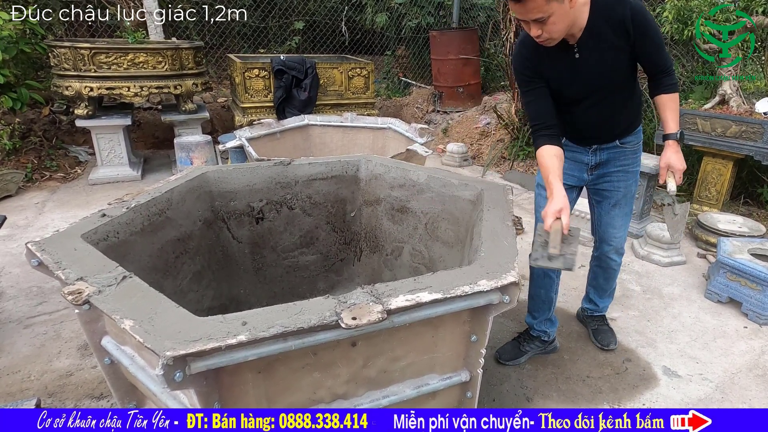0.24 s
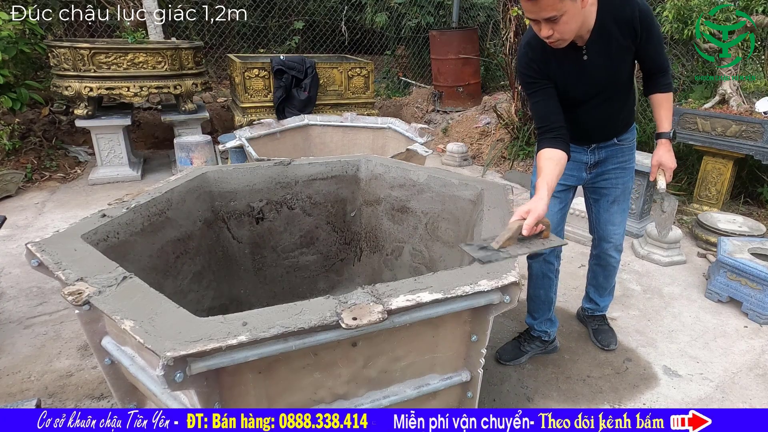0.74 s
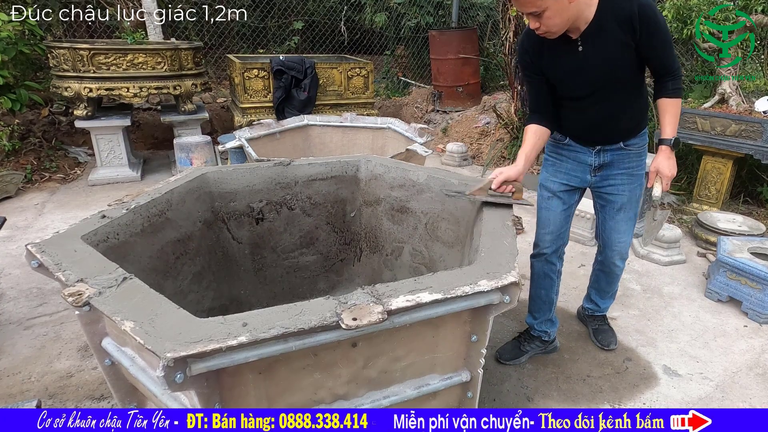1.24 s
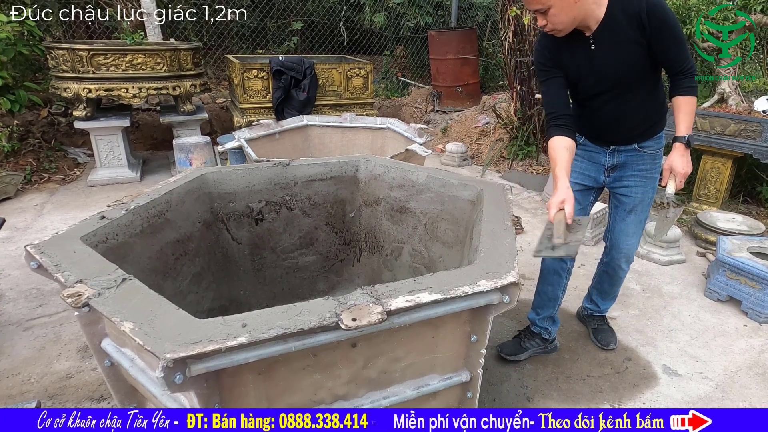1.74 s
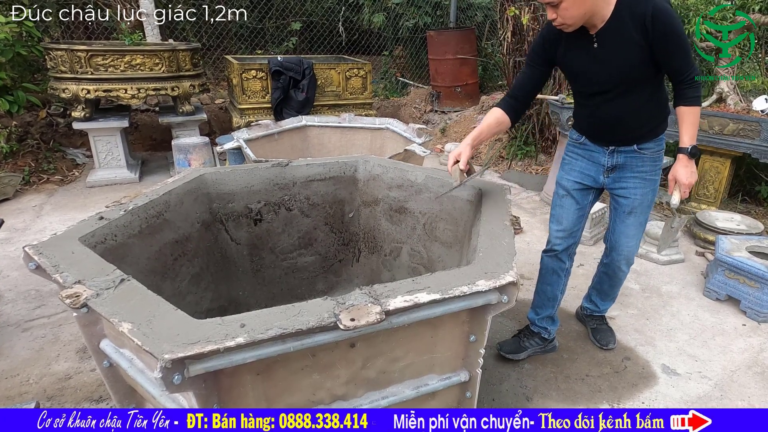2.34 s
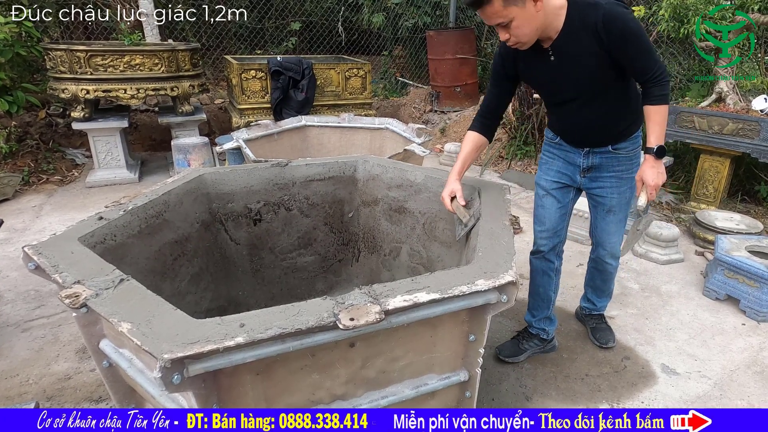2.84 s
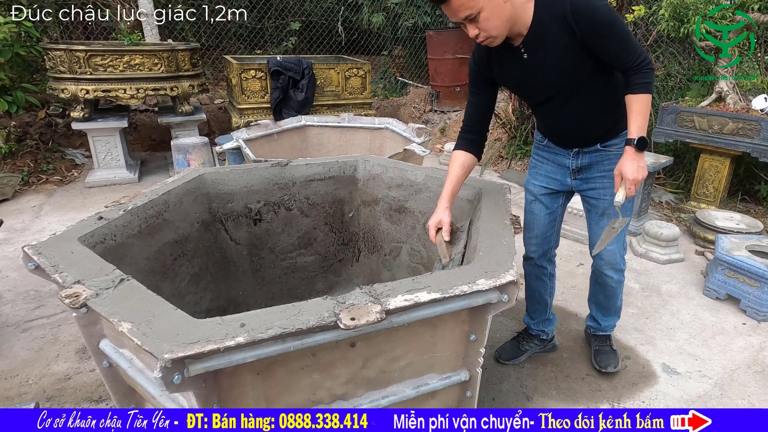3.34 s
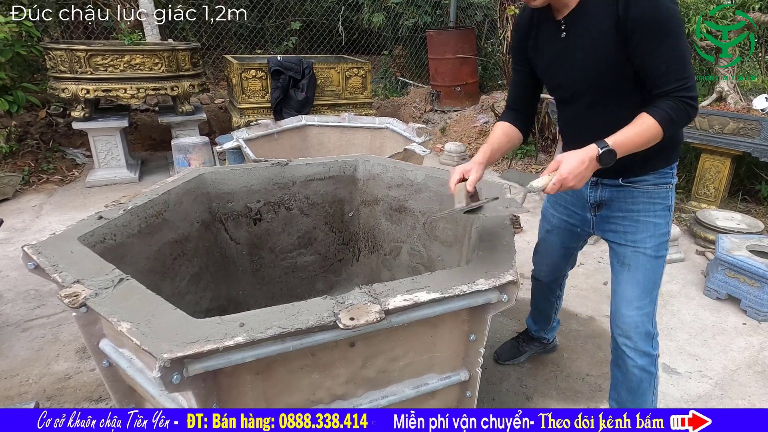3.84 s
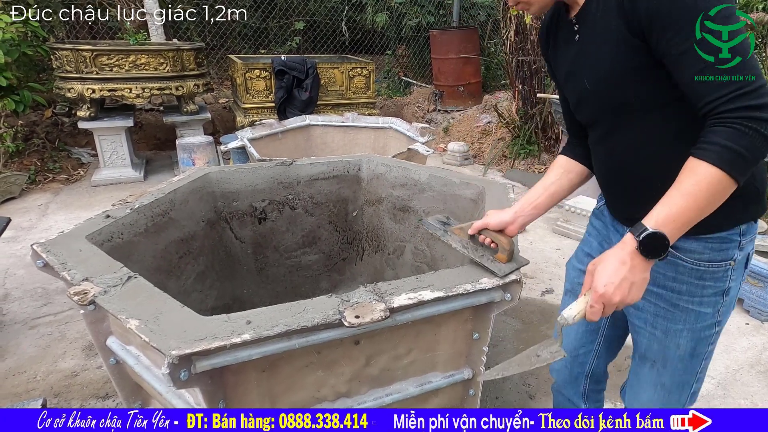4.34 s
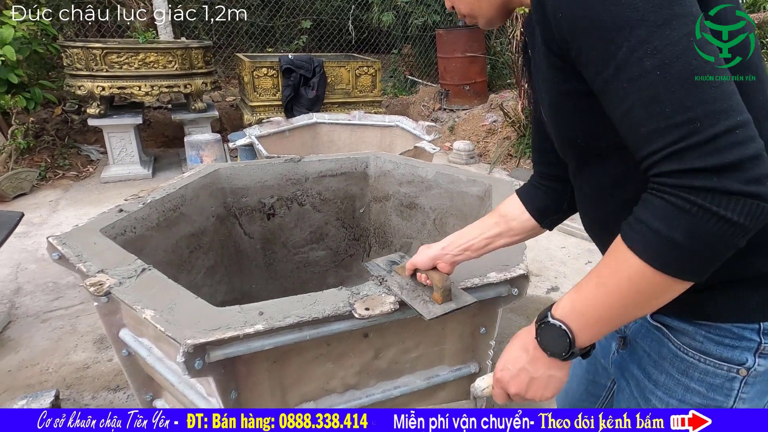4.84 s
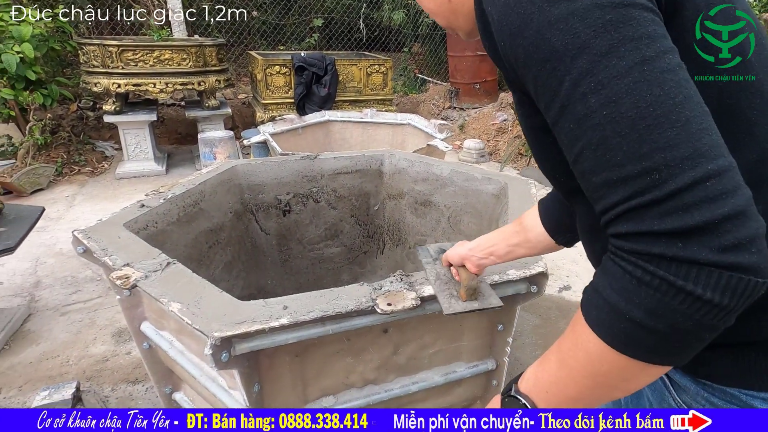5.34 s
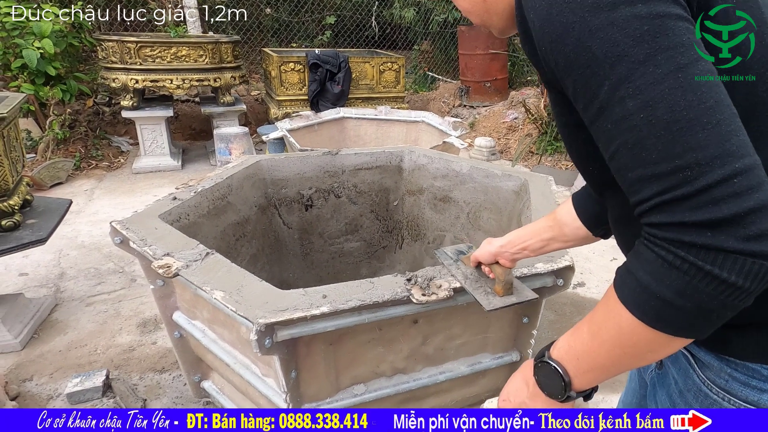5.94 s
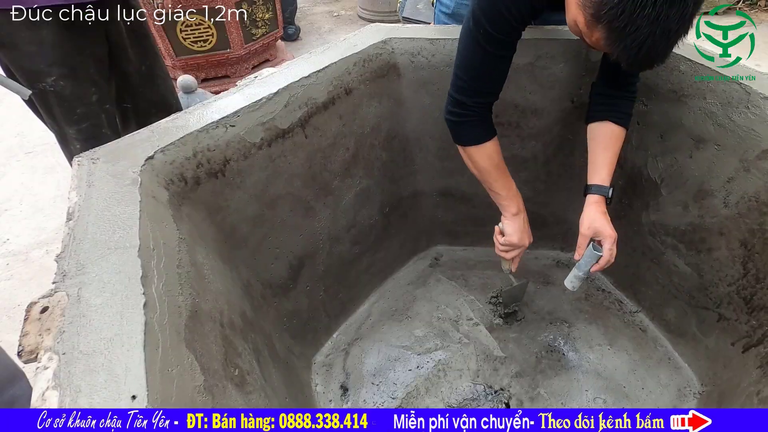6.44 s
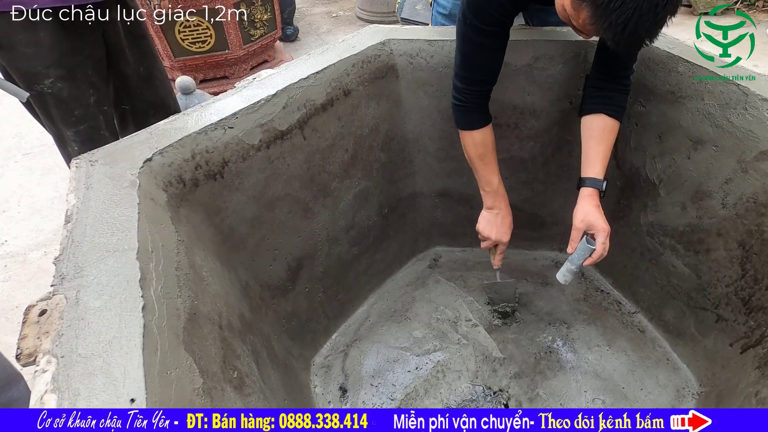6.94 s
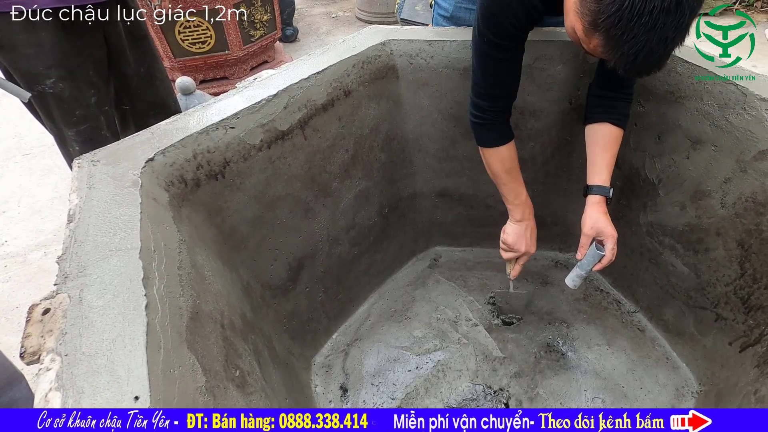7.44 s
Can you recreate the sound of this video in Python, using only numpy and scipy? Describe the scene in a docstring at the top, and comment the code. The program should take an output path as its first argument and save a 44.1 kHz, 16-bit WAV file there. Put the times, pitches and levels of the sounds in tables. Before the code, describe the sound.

A steel trowel rasps over gritty wet cement in short uneven strokes with taps, then quieter scrapes and grit snaps inside a booming hollow mould.

```python
"""Trowel on wet cement

A steel trowel smooths wet cement on the rim of a big planter mould in a yard, then works inside the mould.
Random sand grains under the blade hiss, ring the damped steel and, under pressure, the mould wall.
Short bursts of noise make the taps and the grit snaps; decaying sines make the thuds,
and brief unsteady sines make low hums and high squeaks.
Filtered noise gives a low outdoor rumble under it all, which booms once the work is inside.
"""
import sys
import numpy as np
from scipy import signal
from scipy.fft import rfft, irfft
from scipy.io import wavfile
from scipy.ndimage import uniform_filter1d

SR = 44100
rng = np.random.default_rng(int(sys.argv[2]) if len(sys.argv) > 2 else 0)


def store_wav(level_fs):
    """Save 16-bit WAV to argv[1]."""
    pcm = np.round(np.clip(np.atleast_2d(level_fs), -1, 1) * 32767)
    wavfile.write(sys.argv[1], SR, pcm.T.astype(np.int16))


N = 338688
T = np.arange(N) / SR  # time in seconds
FREQS = np.maximum(np.arange(N // 2 + 1) * SR / N, 1)  # in Hz

# Levels are in dB; most layers also add a gain of their own later.
# A stroke lands, presses harder, eases and lifts. Each row: start in seconds, press time in seconds,
# ease time in seconds, rasp at its hardest in dB, swell before that in dB, drop after it in dB; then, against
# the rasp, blade ring in dB, wall drag in dB, wet fizz in dB and extra ring as the blade slides off in dB;
# then centre of the rasp in Hz and centre of the blade ring in Hz.
STROKE_ROWS = [ (.092, .045, .012, -37, 10, 4, -3, -14, -15, 0, 3200, 1340),
               (.155, .105, 0.044, -37, 3, -2.5, -8, -13.5, -16, -17, 2980, 1320),
               (0.304, 0.02, 0.042, -28.5, 6.5, 1.5, -5, -15, -15, 8, 2870, 1380),
               (.726, 0.054, .014, -42.5, 0, 8.5, -5.5, -12.5, -13.5, 3, 3250, 1440),
               (0.804, 0.066, 0.019, -31.5, 7, 1, -2, -11, -16.5, 3, 2950, 1480),
               (.89, 0.041, 0.048, -28, 3.5, 2.5, -9.5, -17, -16, 11, 3250, 1290),
               (1.342, 0.015, 0.032, -35, 6, 5.5, 1.5, -16, -18.5, -12, 2300, 1230),
               (1.395, 0.021, .018, -33.5, 2, 2.5, -2.5, -20, -16.5, 2, 2300, 1280),
               (1.449, .006, 0.013, -43.5, -2, 10, 0, -12, -11, -2, 2490, 1370),
               (1.521, .006, .02, -50.5, 2, 10, -3, -4, -18, -6, 2500, 1310),
               (1.636, 0.21, .024, -27.5, 16.5, 0.5, -13, -22.5, -14.5, 15, 3250, 1390),
               (1.88, 0.043, 0.14, -56, 2, 16, -13.5, -10, -21, 0, 3200, 1330),
               (2.44, 0.14, 0.019, -70, 4, 0, -3, -3.5, -15, 12, 3200, 1000),
               (2.83, .145, .02, -58.5, 17, 0, -3, -20, -13, 0, 2700, 1470),
               (2.975, .012, 0.11, -50.5, 3, 3.5, -1.5, -16, -15, 2.5, 2800, 1500),
               (3.11, 0.036, .02, -49, 17, 2.5, -4, -21, -16, 1, 2850, 1390),
               (3.179, .04, .13, -49.5, -1, 11, 0, -23, -15.5, 0, 3000, 1550),
               (3.364, 0.073, 0.016, -40.5, 10, 9, -3, -16, -16, 8.5, 2860, 1590),
               (3.882, 0.0045, 0.025, -31.5, 7, 13, -7, -16.5, -20, 15, 2420, 1520),
               (3.906, 0.049, 0.096, -30, 9.5, 21.5, -0.5, -14.5, -14.5, 7, 2750, 1480),
               (4.335, .02, .005, -52, 8, 0, 5, -7, -24, 0, 3200, 1200),
               (4.352, 0.072, 0.0086, -32, 5, 7.5, 7.5, -6, -20.5, 0, 2700, 1295),
               (4.483, .004, 0.043, -34.5, 1, 17.5, -1, -15.5, -16, 8.5, 3450, 1570),
               (4.565, 0.016, 0.039, -48.5, 18, 9, -6, -14, -16, 5, 2550, 1480),
               (4.644, 0.075, .01, -40, 13, 0, 0, -15.5, -16, -5, 2960, 1520),
               (4.721, 0.024, 0.055, -29.5, 11, 2.5, 2, -8, -18.5, -2.5, 2750, 1460),
               (4.815, .11, .045, -27.5, 3.5, 1.5, 0, -12.5, -15.5, 2, 2980, 1350),
               (4.965, .008, .035, -33, 0, 12, -1, -3, -13, 0, 3000, 1240),
               (5.0, 0.016, 0.076, -52, -8, 16, 8, 3, -20, 4, 2900, 1100),
               (5.117, 0.15, .02, -40.5, 12, 5, 2.5, -4, -19.5, 3.5, 2800, 1240),
               (5.263, 0.092, 0.038, -32.5, 8, 10.5, -3.5, -7.5, -14.5, 1, 3480, 1510),
               (5.40, .04, 0.044, -39, 1, -0.5, -5.5, -9, -16.5, 4, 3000, 1470),
               (5.475, 0.068, 0.075, -27.5, 9, 10.5, 2.5, -9.5, -15, -3, 3050, 1500),
               (5.618, 0.095, 0.072, -28, 8.5, 7.5, 0.5, -8.5, -16.5, -4, 2950, 1440),
               (5.795, 0.054, 0.069, -28.5, 8.5, 0, 2, -7, -16.5, -7.5, 2820, 1600),
               (5.925, 0.1, 0.063, -31.5, 9.5, 5.5, 2, -5.5, -14.5, -1.5, 3230, 1480),
               (6.094, 0.062, 0.0055, -38.5, 5, 4.5, -2, -6, -14, 1.5, 3360, 1580),
               (6.279, 0.026, .008, -53, 1, 7, -3, -11, -7, 3, 2700, 1640),
               (6.312, 0.012, 0.029, -34.5, 11, 0.5, 7, -6, -20, -7, 2320, 1620),
               (6.36, .01, 0.081, -49, 0, 17, -5, -10, -11.5, -2, 2600, 1300),
               (6.455, 0.024, 0.0074, -38, 18, 5.5, -0.5, -8, -12, 4, 3180, 1280),
               (6.519, 0.013, 0.16, -53, -11, 15, -0.5, -7, -8.5, 0, 2550, 1230),
               (6.725, 0.047, 0.05, -49.5, 13, 7, 0.5, -7, -10, 7.5, 4050, 1260),
               (6.86, 0.11, .1, -55, 11, 11, 3, -12, -10, 0, 2700, 1230),
               (7.19, .068, .008, -44.5, 19.5, 5, -1.5, -14, -11.5, -5, 4270, 1450),
               (7.421, .057, 0.012, -43.5, 5, -1, -6, -13.5, -14, -1, 2950, 1380),
               (7.48, 0.027, 0.078, -33, 16, 23.5, -10.5, -15, -19.5, -6, 2560, 1620),
               (7.606, 0.027, 0.037, -45, 10, -2.5, -10, -15, -20, 6.5, 2540, 1330), ]
# The flat blade lands or chatters. Each row: start in seconds, dull body in dB, bright edge in dB.
TAP_ROWS = [(0.097, -63, -22.5), (.134, -51, -33), (.26, -50, -31), (0.727, -52.5, -32.5),
            (1.318, -43.5, -32.5), (1.341, -48, -36), (1.452, -52, -33.5), (1.52, -48, -38),
            (1.641, -49, -35), (2.593, -72, -53), (2.98, -64, -44), (3.071, -63, -44), (3.183, -62, -33.5),
            (3.219, -70, -40), (3.431, -48.5, -29), (3.88, -65, -22.5), (3.938, -39.5, -29),
            (4.056, -42.5, -32.5), (4.356, -49, -39), (4.416, -34.5, -39), (4.479, -63, -32),
            (4.716, -51, -25), (5.127, -36, -33), (5.162, -37, -32), (5.187, -39, -32), (5.21, -36, -36),
            (5.265, -42.5, -30), (6.328, -47, -30), (7.53, -46, -46), (7.604, -51, -32.5),
            (7.634, -57, -37)]
# Grit snaps under the steel. Each row: start in seconds, level in dB.
SNAP_ROWS = [(2.484, -60), (2.5336, -58), (6.477, -40), (6.5122, -17), (6.5404, -54), (6.6722, -48),
             (6.762, -31), (6.7825, -32), (6.8014, -24.5), (6.8625, -43), (6.8867, -41), (6.967, -42),
             (6.978, -39), (7.2555, -34.5), (7.602, -49)]
# The mould takes the weight of the hand. Each row: start in seconds, level in dB, pitch in Hz.
THUD_ROWS = [(0.167, -48.5, 119), (.33, -40.5, 149.3), (0.391, -42, 53.5), (0.74, -38, 94.4),
             (0.866, -45, 125), (1.328, -46, 110), (1.359, -45, 145), (1.852, -49, 169.1),
             (5.25, -39.5, 154), (5.592, -37.5, 147), (6.307, -42, 117), (6.77, -43.5, 231)]
# Brief unsteady tones, from low hums to high squeaks.
# Each row: middle in seconds, half length in seconds, pitch in Hz, level in dB.
TONE_ROWS = [(0.264, 0.0046, 598, -33), (.935, 0.023, 3930, -33), (1.36, 0.023, 1213, -42),
             (1.40, .04, 3710, -46), (1.856, 0.011, 399, -38), (1.868, 0.011, 1247, -32),
             (2.596, .006, 820, -58), (2.99, .02, 2850, -45), (3.19, .09, 5450, -61),
             (4.392, 0.022, 358, -40), (4.404, .01, 2640, -27.5), (4.845, 0.014, 2540, -26.5),
             (5.32, 0.016, 1400, -33), (5.41, .01, 2120, -37), (5.538, .025, 1400, -25.5),
             (5.725, 0.026, 3100, -26.5), (5.827, 0.023, 600, -32), (5.865, .024, 1400, -30),
             (5.916, .012, 1680, -26), (5.957, 0.024, 152.7, -33.5), (6.004, 0.041, 380, -35)]

# Damped resonances of the whole blade, of its edge, of the mould wall and of a small pointed trowel.
# Each row: pitch in Hz, width in Hz before extra damping, level in dB.
BLADE_MODES = [(888, 160, -3.5), (1052, 160, -4.5), (1205, 153, -2), (1375, 102, -1), (1520, 52, -6.5),
               (1628, 254, -0.5), (1815, 75, -5.5)]
EDGE_MODES = [(2057, 224, 4), (2265, 193, 2), (2505, 220, 0.5), (2800, 120, 1), (3112, 185, -1),
              (3620, 233, -2.5), (3910, 220, -0.5), (4170, 170, 0), (4403, 65, 1), (4630, 400, -1),
              (5235, 480, 0), (6280, 130, -4.5)]
WALL_MODES = [(157, 55, 2), (248.7, 41, -4.5), (390, 130, -4), (556.5, 130, -1.5), (647, 113, -4),
              (836, 77, -6.5)]
POINT_MODES = [(1160, 390, -12.5), (1840, 470, -7), (2740, 1600, -10.5), (3520, 330, -3), (4570, 360, 1.5),
               (5400, 460, -6), (5850, 400, -9), (8870, 480, -7.5), (11600, 2400, -17.5)]

# Tone colours of the sand hiss, the dull knock, the open yard and the hollow mould.
# Each row: frequency in Hz, level per Hz in dB.
SAND_COLOUR = [(300, -33), (1200, -7.5), (2000, -3.5), (3000, -1), (5300, -9), (7000, -19), (8700, -21),
               (10500, -30.5), (12300, -33.5), (14500, -52)]
KNOCK_COLOUR = [(150, -7), (450, -23.5), (750, -9.5), (1020, -2.5), (1250, -1), (1500, -9.5), (1850, -5),
                (2400, -19), (5000, -80)]
YARD_COLOUR = [(12, -49), (20, -9.5), (49, -5), (92, -10.5), (135, -20), (174, -12.5), (270, -20.5),
               (328, -27.5), (367, -25), (656, -34), (1080, -31), (1310, -28), (2040, -36.5), (6360, -42.5),
               (15000, -74.5)]
HOLLOW_COLOUR = [(12, -31), (20, -4.5), (49, 3), (205, -10.5), (242, -13), (377, -20), (470, -26),
                 (1460, -27.5), (2850, -37.5), (3180, -40), (3460, -44), (6360, -48), (6910, -53),
                 (10200, -64), (15000, -92)]

# Rough loudness of the rumble over time. Each row: time in seconds, level in dB.
RUMBLE_LOUDNESS = [(0, -1), (1.1, -2), (2.4, -4.5), (3.5, 0), (5.1, 0), (6.4, -3), (7.68, -2)]
# Sound that reaches the two microphone ports unrelated. Each row: frequency in Hz, level against direct in dB.
SCATTER_SHARE = [(60, -23), (300, -16), (1300, -13), (3000, -9), (6500, -5), (14000, -2)]

YARD_DB, HOLLOW_DB = -53.5, -40  # rumble levels before its loudness curve
INSIDE_S = 6.285  # the work moves inside the mould
PORT_LAG_S = 3.7e-5
TOP_HZ = 13900
LAND_S, LIFT_S = 0.0016, 0.011  # how fast the blade bites and lets go
SLIDE_OFF_S, SLIDE_OFF_OCTAVES = 0.021, .17  # as a stroke ends, the ring's level shifts and its centre falls
SLIDE_OFF_WALL = 0.8  # share of that extra ring, in dB, that reaches the wall
BLADE_LAW, WALL_LAW, FIZZ_LAW = 1.08, 0.71, 0.99  # dB gained per dB of rasp as the hand presses


def undb(db):
    """Turn decibels into gain."""
    return 10 ** (np.asarray(db) / 20)


def unit(x):
    """Scale to an average (rms) level of 1."""
    return x / np.sqrt(np.mean(x ** 2))


def gains(points):
    """Draw a gain curve over all frequencies through (Hz, dB) points."""
    hz, db = np.transpose(points)
    return undb(np.interp(np.log(FREQS), np.log(hz), db))


def colour(x, points):
    """Give sound the tone of (Hz, dB) points, with no smear ahead of each hit."""
    # folding the cepstrum makes the filter act only after its input
    cepstrum = irfft(np.log(gains(points)), N)
    cepstrum[1:N // 2] *= 2
    cepstrum[N // 2 + 1:] = 0
    return irfft(rfft(x) * np.exp(rfft(cepstrum)), N)


def band(x, lo_hz, hi_hz, order=3):
    """Keep the sound between two frequencies."""
    edges = [lo_hz, min(hi_hz, SR / 2 - 1)]
    return signal.sosfilt(signal.butter(order, edges, "band", fs=SR, output="sos"), x)


def ring(x, modes, damping):
    """Strike a set of resonances; more damping makes them wider and shorter."""
    out = 0
    for k, (hz, width, db) in enumerate(modes):
        sharpness = max(hz / (width * damping), 1)
        mode = signal.lfilter(*signal.iirpeak(hz, sharpness, SR), x)
        out = out + (-1) ** k * undb(db) * mode  # alternate signs
    return out


def walk(rate):
    """Wander smoothly by chance around 0, with an rms of 1."""
    k = max(int(SR / rate), 1)
    steps = np.repeat(rng.standard_normal(N // k + 1), k)[:N]
    return unit(uniform_filter1d(steps, k))


def rumble(points, db):
    """Outdoor noise: the bass wavers a little and is alike on both sides, the hiss is wide."""
    mid, side = rfft(rng.standard_normal((2, N))) * gains(points)
    side = side * gains([(60, -22.0), (200, -14), (1000, -5.5), (4000, -1.0)])
    air = irfft(np.array([mid + side, mid - side]), N)
    waver = undb(1.7 * walk(7))
    bass = band(air, 13, 220, order=1)
    return undb(db) * unit(air + bass * (waver - 1))


def grit(rate, spread_db, judder_db, judder_rate):
    """Sand grains of unequal size, bunched as the blade sticks and slips; rows: direct, scattered."""
    size = undb(spread_db * np.minimum(rng.exponential(size=N), 4))
    hits = rng.random(N) < rate / SR  # rate is grains per second
    judder = undb(judder_db * walk(judder_rate))
    return hits * size * rng.standard_normal((2, N)) * judder


def stray_grit(db=-78, inside_db=9):
    """Loose grains tick faintly under shoes and tool, louder inside the mould."""
    ticks = grit(rate=45, spread_db=3.5, judder_db=3, judder_rate=6)
    level = undb(db + inside_db * (T > INSIDE_S))
    return level * unit(band(ticks, 1400, 4860, order=4))


def pressure():
    """Hand pressure sets the gains of rasp, blade, wall and fizz, and the centres of rasp and blade ring."""
    out, centres = np.zeros((4, N)), np.full((2, N), 2000.)
    for (s, press_s, ease_s, db, swell_db, drop_db,
         blade_db, wall_db, fizz_db, off_db, edge_hz, blade_hz) in STROKE_ROWS:
        length = press_s + ease_s
        near = slice(*np.searchsorted(T, [s - .02, s + length + .15]))
        age = T[near] - s
        push_db = np.interp(age, [0, press_s, length], [-swell_db, 0, -drop_db])
        contact = np.exp(np.minimum(age, 0) / LAND_S - np.maximum(age - length, 0) / LIFT_S)
        off = np.exp(-(np.minimum(age - length, 0) / SLIDE_OFF_S) ** 2)
        layers_db = np.array([
            push_db,
            blade_db + BLADE_LAW * push_db + off_db * off,
            wall_db + WALL_LAW * push_db + SLIDE_OFF_WALL * off_db * off,
            fizz_db + FIZZ_LAW * push_db])
        layers = contact * undb(db + layers_db)
        pitch = [np.full(len(age), edge_hz), blade_hz * 2 ** (-SLIDE_OFF_OCTAVES * off)]
        # where strokes overlap, the louder rasp picks the pitch and each layer keeps its louder gain
        centres[:, near] = np.where(layers[0] > out[0, near], pitch, centres[:, near])
        out[:, near] = np.maximum(out[:, near], layers)
    return out, centres


def sliding_ring(x, modes, centre_hz, focus_octaves, damping):
    """The contact point favours modes near a centre; each swells, fades and bends as it slides."""
    out = 0
    for hz, width, db in modes:
        favour = 1 / (1 + (np.log2(hz / centre_hz) / focus_octaves) ** 2)
        wander = undb(1.8 * walk(7))
        once = ring(x, [(hz, width, db)], damping)
        mode = ring(once, [(hz, width, 0)], damping)
        # the shifting load bends the pitch slightly: read the sound early or late by some samples
        bent = np.arange(N) + 14 * walk(7)
        mode = np.array([np.interp(bent, np.arange(N), row) for row in mode])
        out = out + favour * wander * mode
    return out


def hold(x, smooth_s=0.026):
    """Bring the running rms to 1, so that the pressure gains set the loudness."""
    power = uniform_filter1d(np.mean(x ** 2, axis=0), int(smooth_s * SR))
    return x / np.sqrt(power + 1e-12)


def crackling(fizz, rim_db=-7, inside_db=1):
    """Single coarse grains pop and ring the pointed steel, most of all inside the mould."""
    pops = grit(rate=350, spread_db=3, judder_db=2, judder_rate=40)
    place = undb(np.where(T < INSIDE_S, rim_db, inside_db))
    rung = ring(pops, POINT_MODES, damping=2.5)
    return fizz * place * unit(band(rung, 2500, 16400, order=2))


def scraping():
    """One stream of grains hisses at the edge, rings the blade and shakes the wall."""
    (rasp, blade, wall, fizz), (edge_hz, blade_hz) = pressure()
    grains = grit(rate=15000, spread_db=2.5, judder_db=1.0, judder_rate=240)
    sand = colour(grains, SAND_COLOUR)
    edge = hold(sliding_ring(grains, EDGE_MODES, edge_hz, focus_octaves=0.53, damping=1.47))
    hiss = unit(band(sand, 2210, 6370, order=2))
    blade_ring = hold(sliding_ring(grains, BLADE_MODES, blade_hz, focus_octaves=0.35, damping=1.56))
    wall_drag = hold(sliding_ring(grains, WALL_MODES, 360, focus_octaves=11, damping=1.76))
    wet_fizz = unit(band(sand, 6440, 13500, order=4))
    out = rasp * (undb(-2.5) * edge + undb(-4.0) * hiss)
    out += undb(-1.96) * blade * blade_ring
    out += undb(1.0) * wall * wall_drag
    return out + crackling(fizz) + undb(1.5) * fizz * wet_fizz


def blows(times, dbs, crack_s, tail_s, tail_db):
    """Each blow is a short crunch of contacts with a weaker rattle after it; rows: direct, scattered."""
    out, age = np.zeros((2, N + SR)), T[:SR // 4]
    shape = np.exp(-age / crack_s) + undb(tail_db) * np.exp(-age / tail_s)
    shape *= 1 - np.exp(-age / (crack_s / 5))  # the contact gives a little before it bites
    for s, db in zip(times, dbs):
        crunch = rng.choice([-1, 1], (2, len(age))) * shape
        start = int(s * SR)
        out[:, start:start + len(age)] += undb(db) * crunch
    return out[:, :N]


def tapping():
    """The blade lands with a dull knock and a gritty edge."""
    s, body_db, edge_db = np.transpose(TAP_ROWS)
    body = blows(s, body_db, crack_s=0.0041, tail_s=0.028, tail_db=-12.5)
    body = colour(body, KNOCK_COLOUR)
    edge = blows(s, edge_db, crack_s=0.0026, tail_s=0.024, tail_db=-13.5)
    edge = band(colour(edge, SAND_COLOUR), 1850, 12600, order=2)
    return undb(28) * body + undb(8.0) * edge


def thudding(decay_s=0.031, rise_s=0.0018):
    """The heavy mould answers a push with a few slow cycles that die away."""
    out = np.zeros(N)
    age = T[:SR // 3]
    shape = np.exp(-age / decay_s) * 2 * (1 - np.exp(-age / rise_s))
    for s, db, hz in THUD_ROWS:
        start = int(s * SR)
        out[start:start + len(age)] += undb(db) * np.sin(2 * np.pi * hz * age) * shape
    return out


def brief_tones(width_share=0.018, least_width_hz=25):
    """Single sines swell and fade briefly with an unsteady pitch, from low hums to high squeaks."""
    out = np.zeros(N)
    drift = walk(120)
    for s, half_s, hz, db in TONE_ROWS:
        near = np.abs(T - s) < 3 * half_s
        pitch = hz + max(width_share * hz, least_width_hz) * drift[near]
        shape = np.exp(-((T[near] - s) / half_s) ** 2)
        out[near] += undb(db) * shape * np.sin(2 * np.pi * np.cumsum(pitch) / SR)
    return out


def snapping():
    """Grains crack under the steel and ring the small stiff pointed blade."""
    s, db = np.transpose(SNAP_ROWS)
    cracks = blows(s, db, crack_s=0.0017, tail_s=0.0064, tail_db=-20.5)
    rung = ring(cracks, POINT_MODES, damping=0.93)
    return undb(13.5) * band(rung, 750, 8300, order=2)


def rim_echo(x, lag_s=.0032, sway=0.226, echo_db=-8):
    """The mould's wall returns the scraping a moment later; the delay drifts as the hand moves."""
    hand = np.interp(T, np.arange(0, 8, .25), rng.standard_normal(32))
    heard = T - lag_s * np.exp(sway * hand)
    echo = np.array([np.interp(heard, T, row, left=0) for row in x])
    return (x + undb(echo_db) * echo) / np.sqrt(1 + undb(echo_db) ** 2)


def ports(x):
    """Two close ports: the left hears later, and the scattered treble differs between them."""
    direct, scattered = rfft(x) / np.sqrt(1 + gains(SCATTER_SHARE) ** 2)
    scattered = scattered * gains(SCATTER_SHARE)
    lag = np.exp(-2j * np.pi * FREQS * PORT_LAG_S)
    left_tone = gains([(150, -1.1), (700, -1.5), (3000, 0.24), (6500, 3.0), (9000, -0.8), (12000, -1.0)])
    right_tone = gains([(150, -1.5), (700, 0.15), (3000, 0.0), (6500, 2.0), (9000, 4.0), (12000, 2.5)])
    left = (direct + scattered) * lag * left_tone
    right = (direct - scattered) * right_tone
    return irfft(np.array([left, right]), N)


def yard_echo(x, t60_s=0.35, wet_db=-21):
    """Moulds and walls around the yard return a thin tail of fading noise."""
    age = T[:SR * 2 // 3]
    tail = band(rng.standard_normal((2, len(age))), 1270, 12000, order=1)
    tail = tail * undb(-60 * age / t60_s) * (1 - np.exp(-age / 0.0029))
    tail /= np.linalg.norm(tail, axis=1, keepdims=True)
    return undb(wet_db) * signal.fftconvolve(x[None], tail, axes=1)[:, :N]


def scene():
    """Trowel work over the rumble, which booms once the microphone leans over the hollow mould."""
    work = rim_echo(scraping()) + tapping() + snapping() + stray_grit()
    work[0] += thudding() + brief_tones()  # direct sound only
    inside = np.clip((T - INSIDE_S) / 0.014, 0, 1)
    floor = (1 - inside) * rumble(YARD_COLOUR, YARD_DB) + inside * rumble(HOLLOW_COLOUR, HOLLOW_DB)
    loudness = undb(np.interp(T, *np.transpose(RUMBLE_LOUDNESS)))
    return ports(work) + yard_echo(work[0]) + floor * loudness


def record(dry):
    """The recorder cuts the top with a steep filter."""
    return signal.sosfilt(signal.ellip(8, .2, 70, TOP_HZ, fs=SR, output="sos"), dry)


dry = scene()
out = record(dry)
store_wav(out)
```